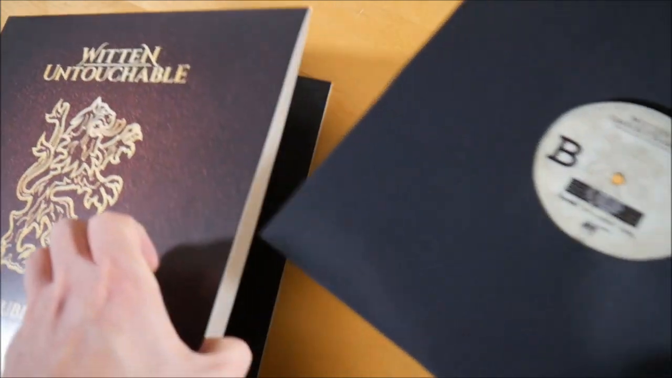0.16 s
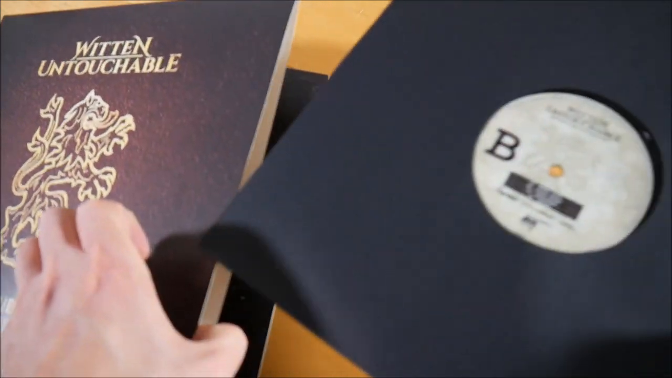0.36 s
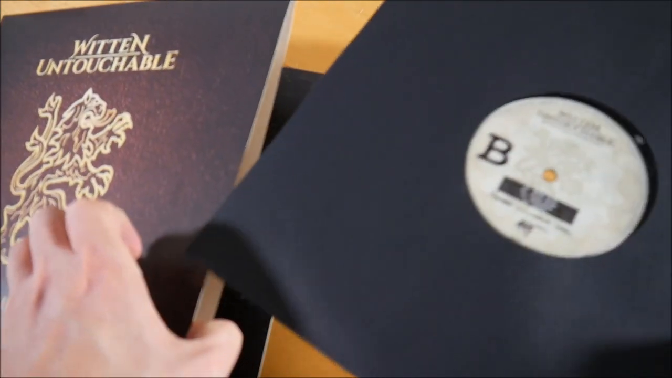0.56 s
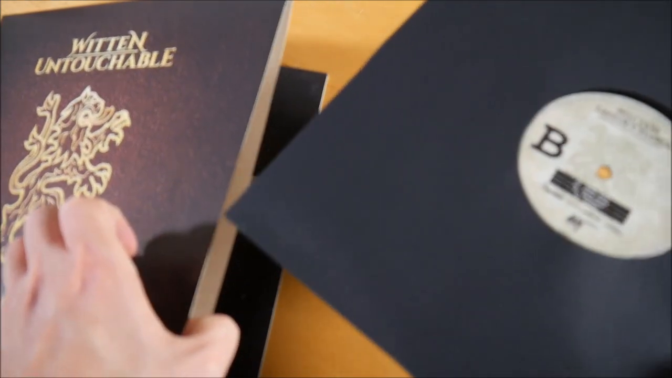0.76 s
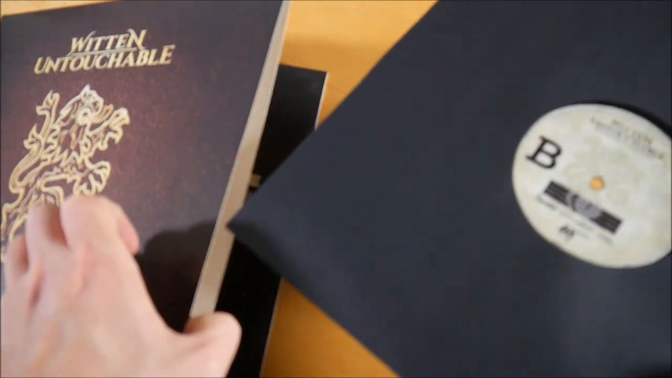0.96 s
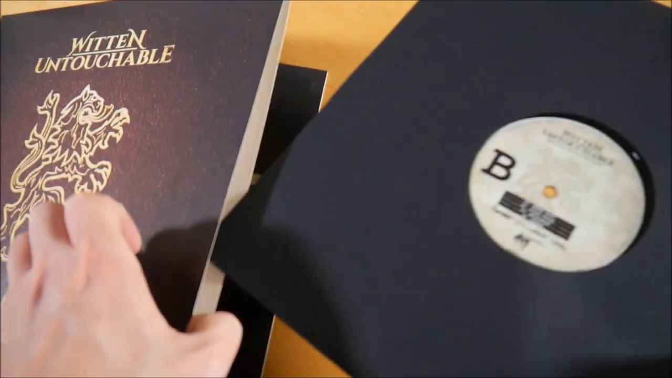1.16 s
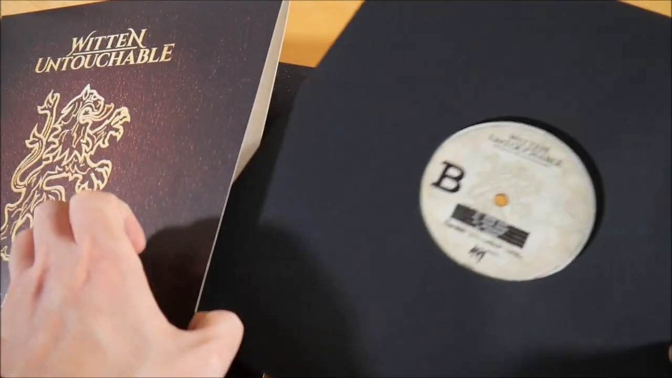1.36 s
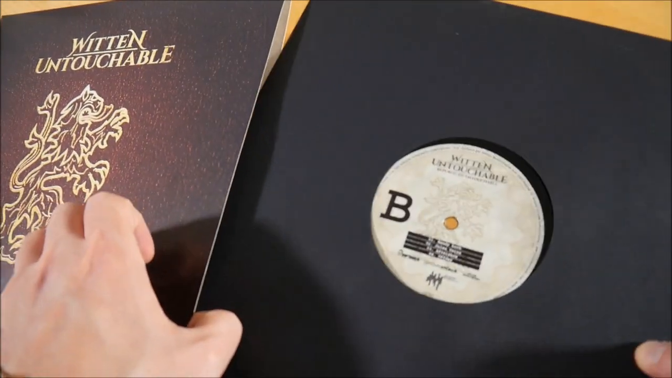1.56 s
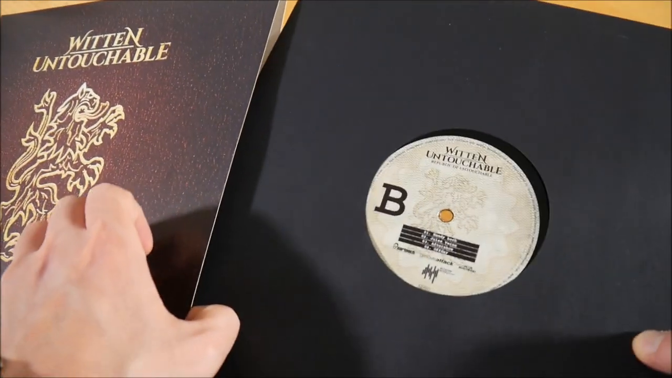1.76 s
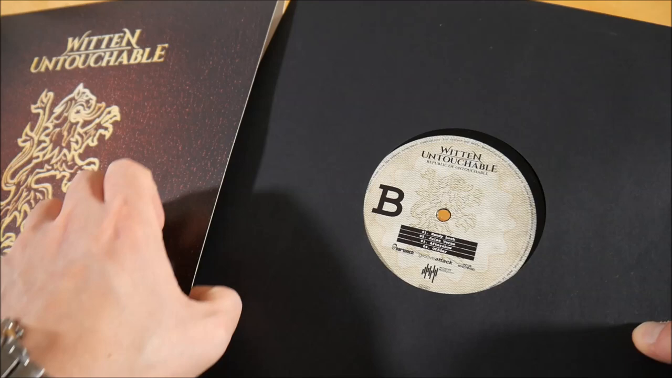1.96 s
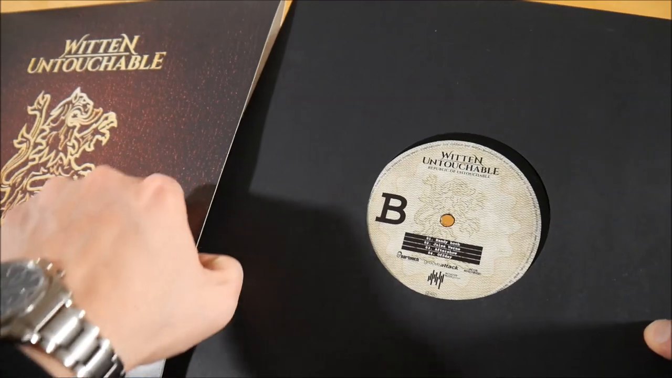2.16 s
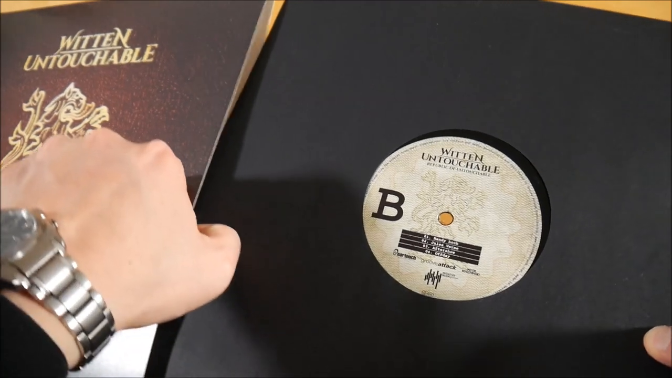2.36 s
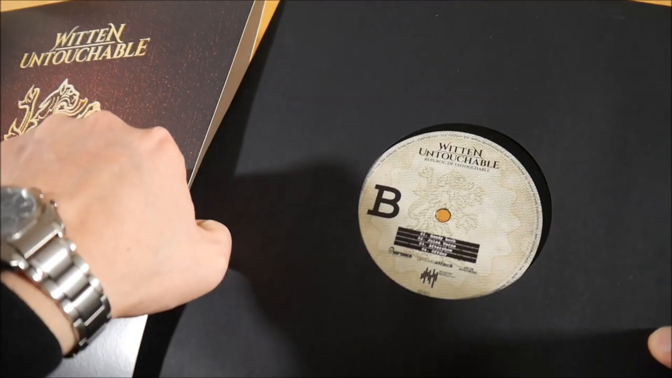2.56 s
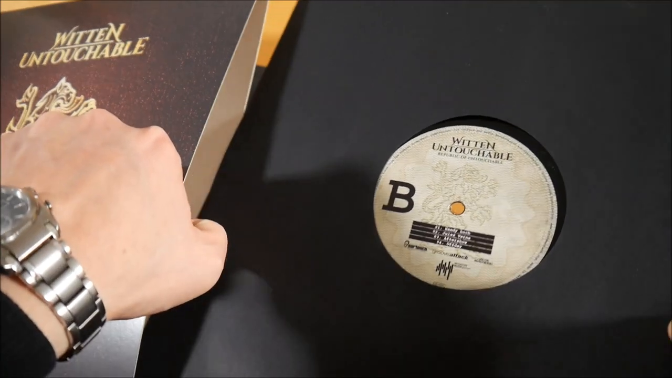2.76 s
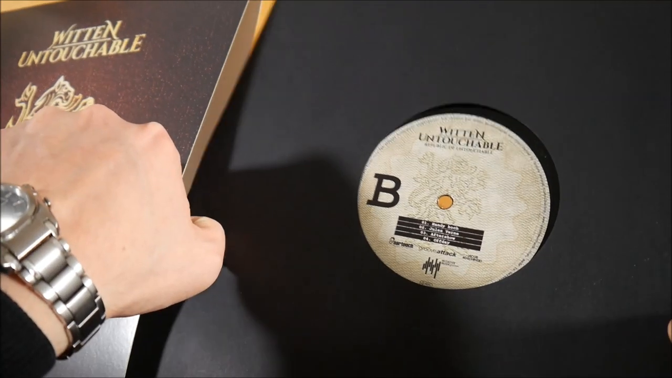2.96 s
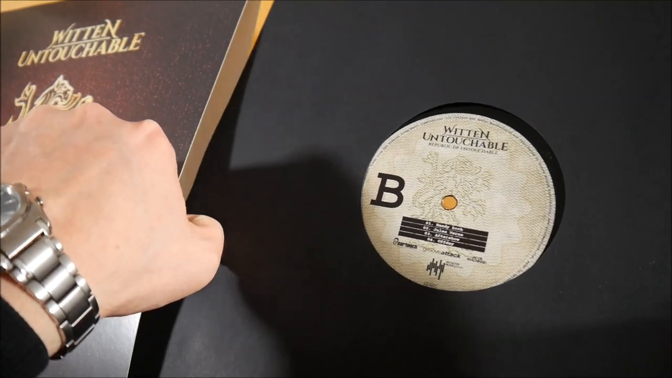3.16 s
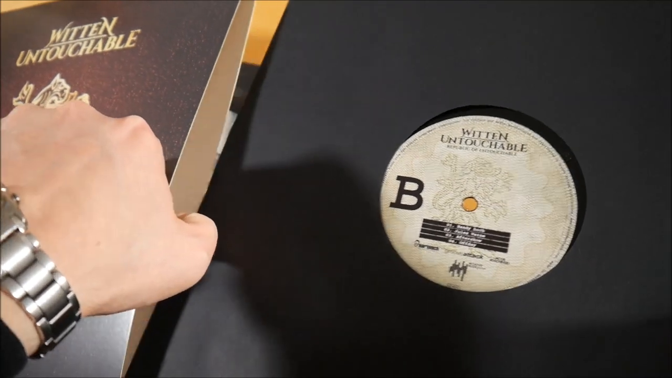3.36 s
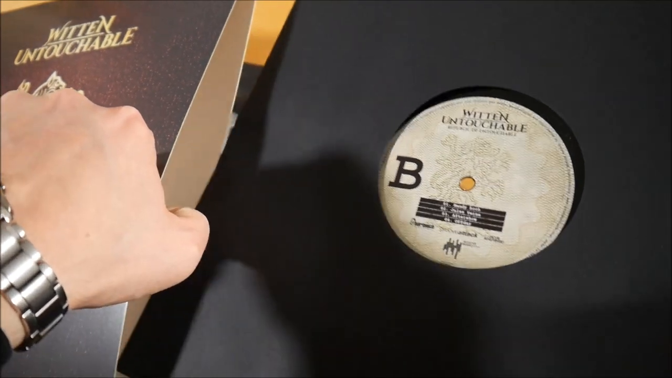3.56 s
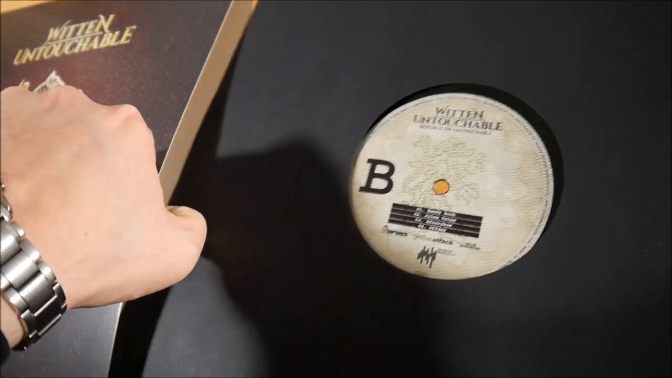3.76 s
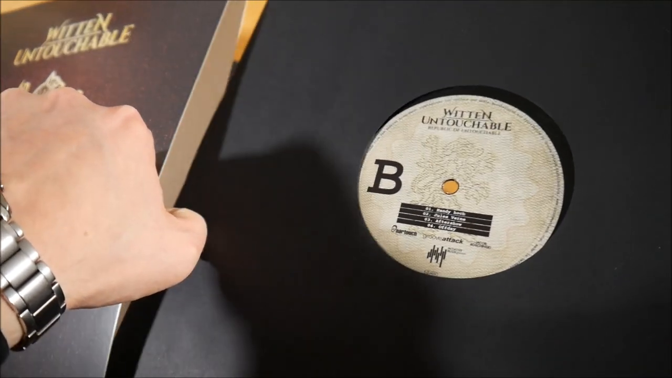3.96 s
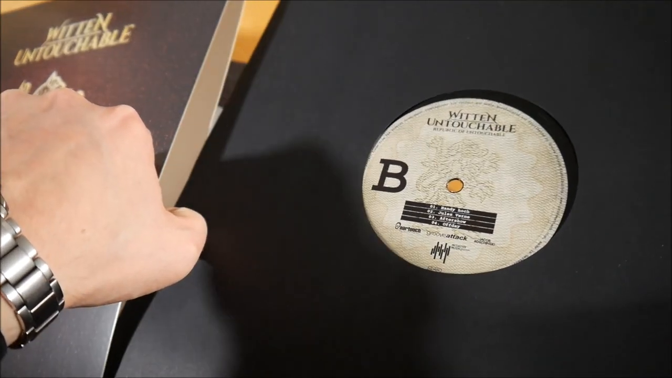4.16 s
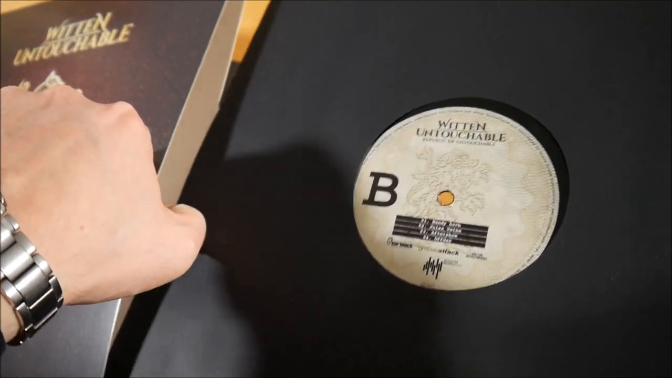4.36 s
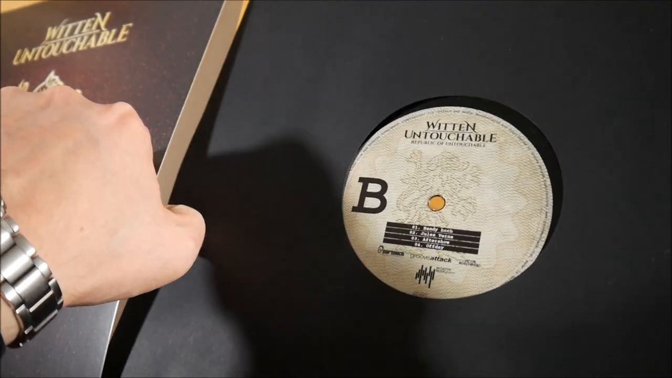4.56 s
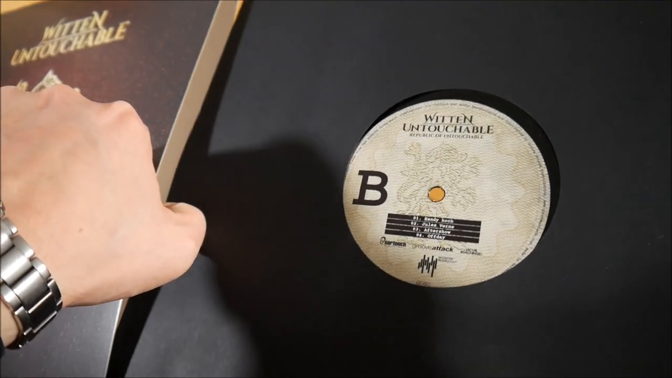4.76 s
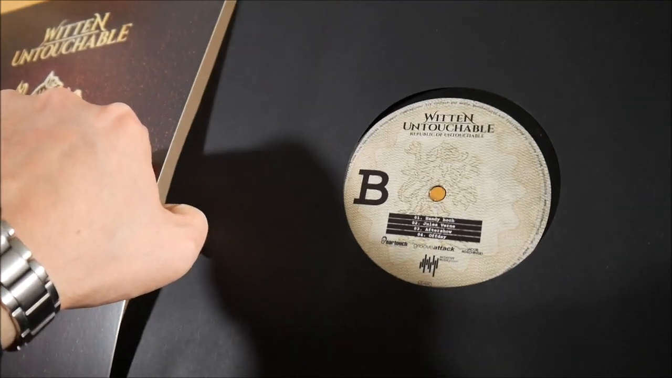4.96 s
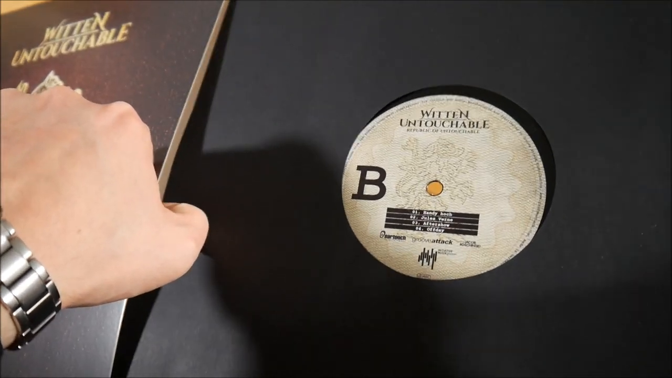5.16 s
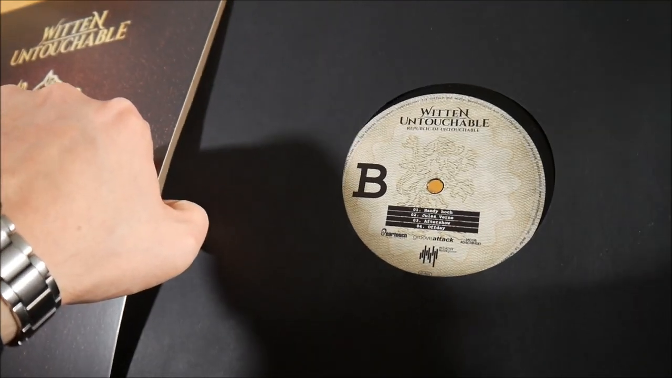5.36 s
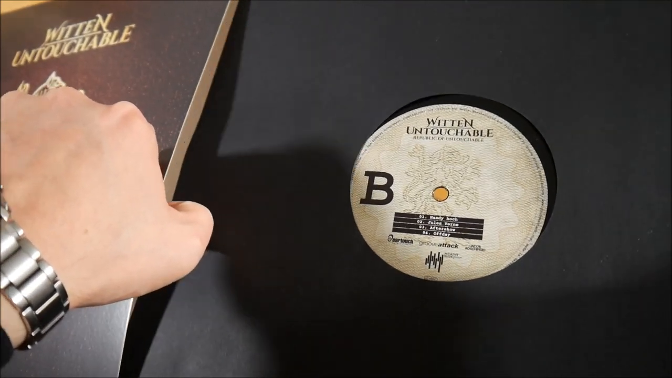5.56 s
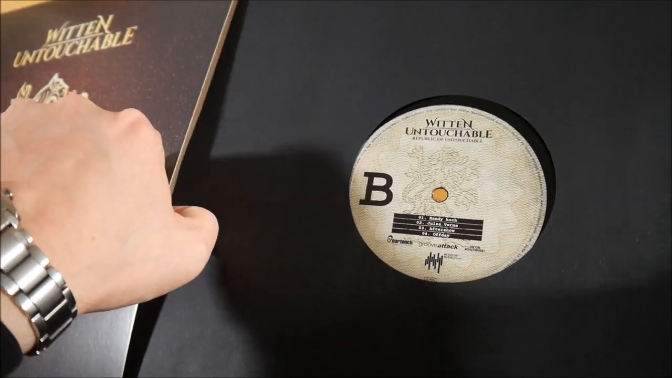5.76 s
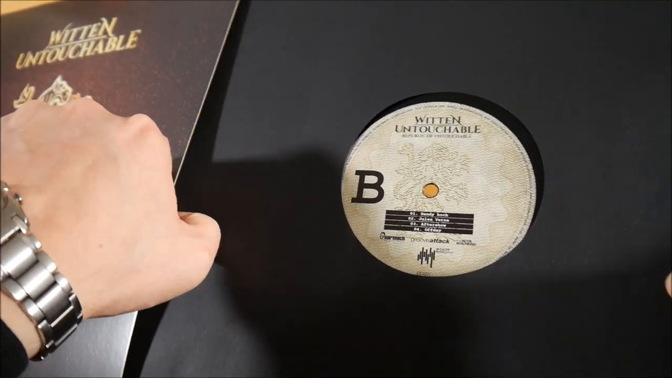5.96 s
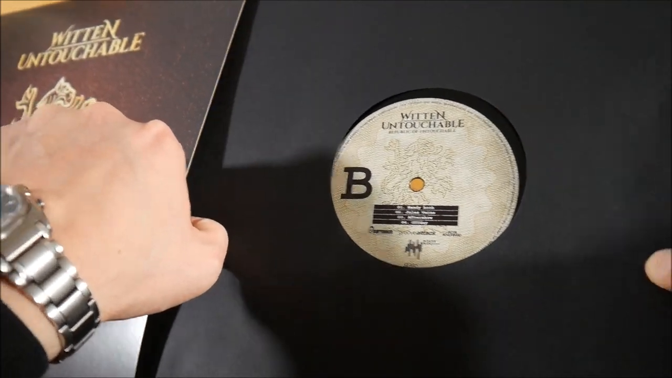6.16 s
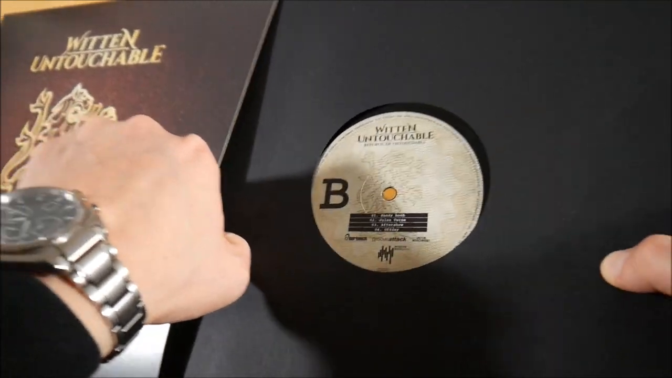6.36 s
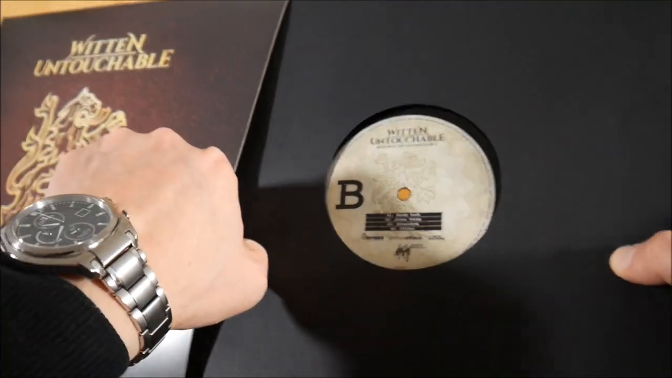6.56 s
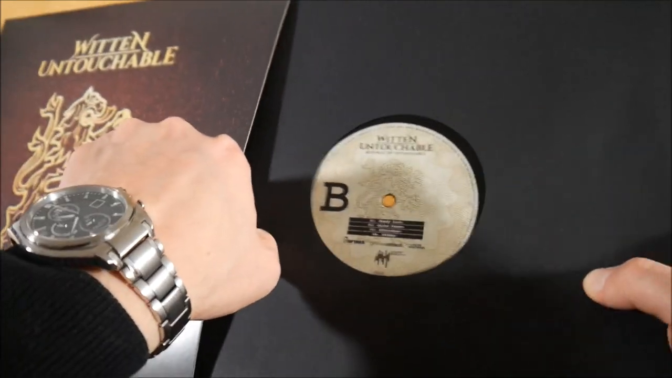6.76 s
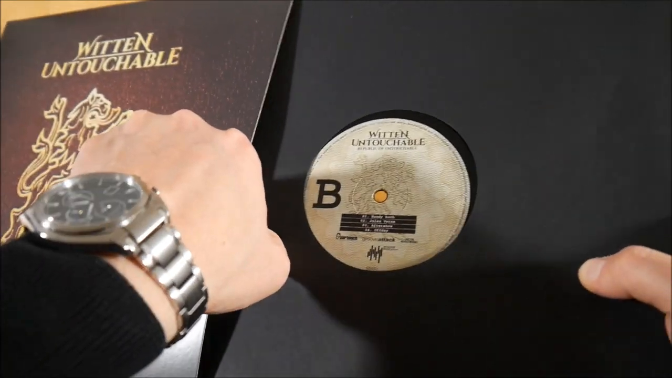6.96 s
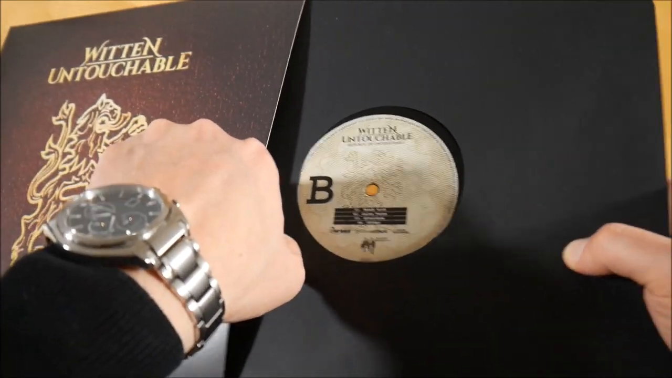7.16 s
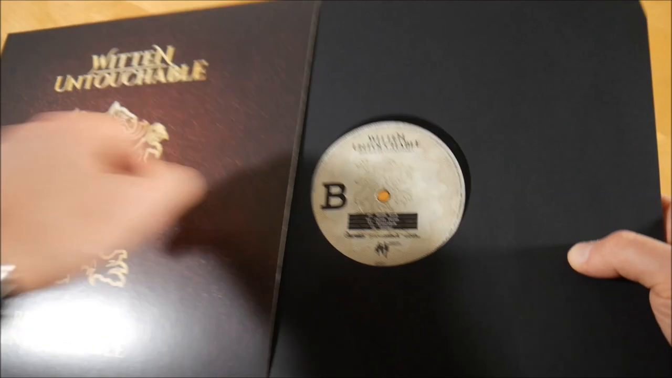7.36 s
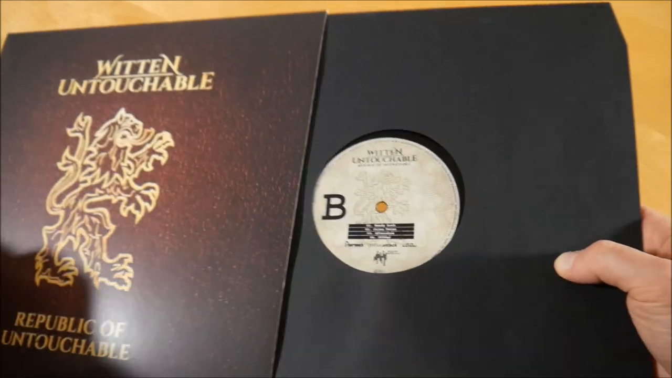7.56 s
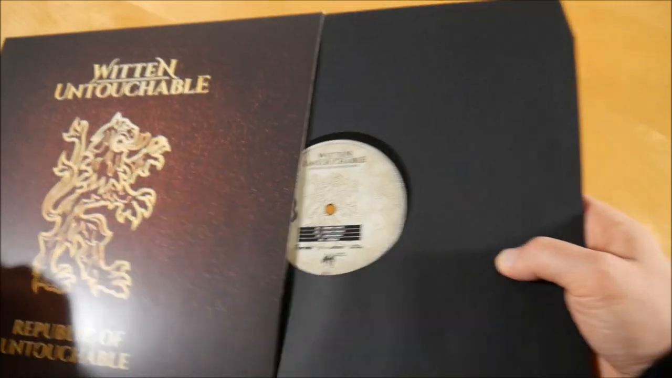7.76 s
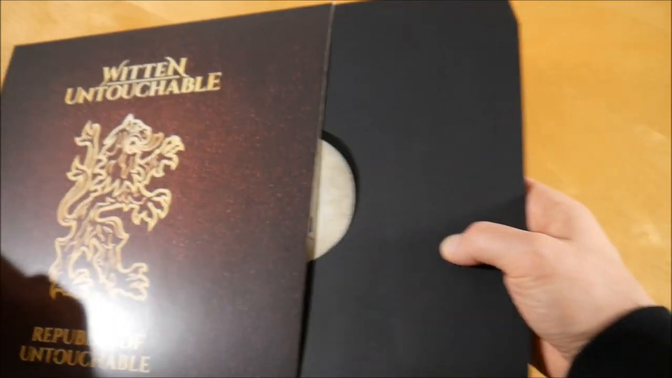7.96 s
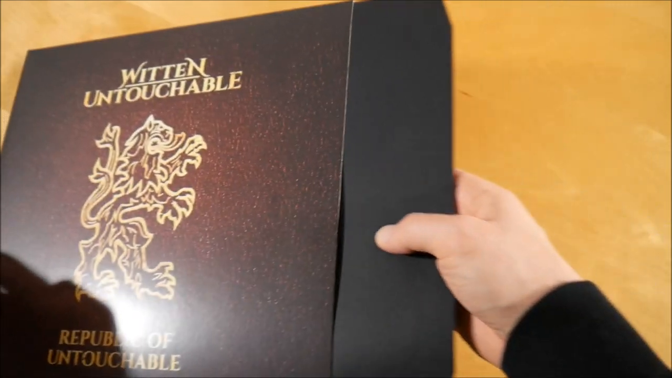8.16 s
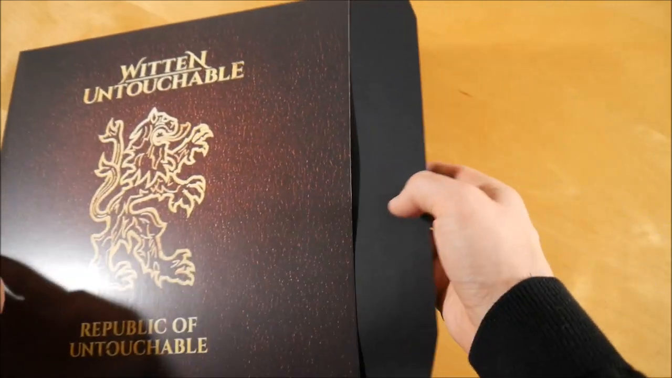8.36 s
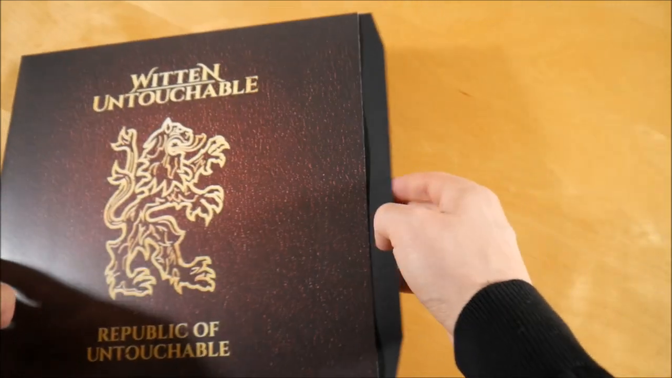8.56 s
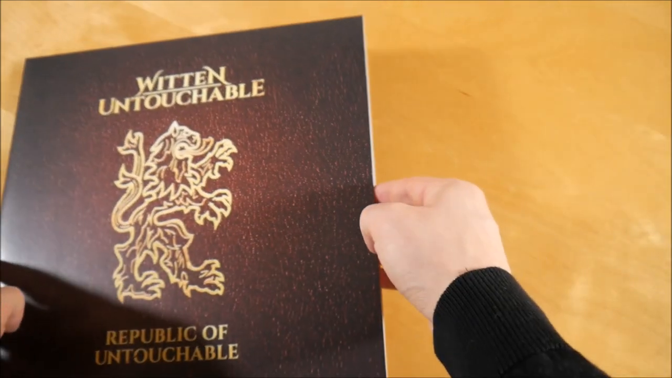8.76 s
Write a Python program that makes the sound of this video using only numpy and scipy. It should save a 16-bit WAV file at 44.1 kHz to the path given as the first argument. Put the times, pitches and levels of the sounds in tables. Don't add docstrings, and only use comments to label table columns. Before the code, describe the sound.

Close papery rubbing and small cardboard taps in a quiet room, two sharp knocks midway, then near-continuous dragging as a sleeved record slides in.

```python
import sys
import numpy as np
from scipy import signal
from scipy.io import wavfile
from scipy.ndimage import uniform_filter1d

SR = 44100
rng = np.random.default_rng(int(sys.argv[2]) if len(sys.argv) > 2 else 0)


def store_pcm(level_fs):
    pcm = np.round(np.clip(level_fs, -1, 1) * 32767).astype(np.int16)
    wavfile.write(sys.argv[1], SR, np.atleast_2d(pcm).T)


def ratio(d):
    e = np.asarray(d, float) / 20
    return 10 ** e


N = 388080

PUSH_S = 6.0

# start in seconds, peak level in dB, pitch in Hz.
SEEKING_KNOCKS = [(0.481, -40, 417), (0.505, -37.5, 398), (1.594, -37, 378), (1.859, -40, 374),
                  (2.011, -35, 406), (2.042, -37.5, 320), (2.203, -32, 340), (2.577, -52, 710),
                  (3.05, -16.5, 450), (3.072, -25.5, 435), (3.085, -36, 390), (3.8662, -10, 500),
                  (3.877, -24.5, 360), (3.883, -27.5, 496), (4.11, -37.5, 304), (4.371, -43, 288),
                  (4.462, -37, 305), (4.565, -38.5, 440), (4.633, -37.5, 294), (4.725, -37.5, 362),
                  (4.865, -36.5, 500), (5.156, -31, 383), (5.212, -35, 384), (5.302, -42, 410),
                  (5.549, -39.5, 727), (5.579, -34.5, 374), (5.637, -32.5, 356), (5.645, -30, 350),
                  (5.891, -37.5, 376), (5.981, -46, 380)]
# start in seconds, peak level in dB, pitch in Hz.
PUSH_KNOCKS = [ (6.196, -35.5, 402), (6.592, -40.5, 452), (6.739, -36, 371), (6.978, -39, 393.2),
               (7.158, -29.5, 427), (7.273, -20.5, 618), (7.368, -32.5, 350), (7.423, -35, 600),
               (7.493, -29, 590), (7.4975, -21, 640), (7.511, -23, 560), (7.5145, -21, 580),
               (7.524, -27, 600), (7.687, -27.5, 585), (7.701, -29.5, 604), (7.754, -23, 737),
               (7.896, -31, 500), (8.341, -32.5, 690), (8.406, -28, 550), (8.747, -31.5, 892)]


def evened(x):
    return x / np.sqrt(np.mean(x ** 2) + 1e-20)


def read(points, hz):
    f, value = np.transpose(points)
    return np.interp(np.log(hz + 1), np.log(f + 1), value)


def follow(points, t):
    return np.interp(t, *np.transpose(points))


def add(mix, s, sound):
    part = mix[round(s * SR):][:len(sound)]
    part += sound[:len(part)]


def resonate(x, hz, width):
    turn = np.exp(2j * np.pi * np.cumsum(hz * np.ones(x.shape[-1])) / SR)
    r = np.exp(-np.pi * width / SR)
    return 2 * (turn * signal.lfilter([1 - r], [1, -r], x / turn)).real


def resonate_twice(x, hz, width):
    return resonate(resonate(x, hz, width), hz, width)


def pair(shared, apart, same, colour, patchy_db, size):
    overlap = size * 3 // 4
    hz, _, (a, b) = signal.stft(np.array([shared, apart]), SR, nperseg=size, noverlap=overlap)
    blotches = rng.standard_normal(a.T.shape)
    patches = evened(uniform_filter1d(uniform_filter1d(blotches, 14, 0), 5, 1)).T
    likeness = np.clip(read(same, hz), 0, 1)
    side = np.sqrt((1 - likeness) / (1 + likeness))[:, None]
    z = np.array([a + side * b, a - side * b])
    z = z * ratio(read(colour, hz)[:, None] + patchy_db * patches)
    return signal.istft(z, SR, nperseg=size, noverlap=overlap)[1][:, :N]


def air():
    # frequency in Hz, level in dB per Hz.
    hiss_colour = [(15, -44), (25, -38), (48, -36), (64, -24), (108, -14), (170, -14), (212, -7),
                   (249, -13), (317, -21.5), (624, -28.5), (714, -19.5), (2550, -33), (11600, -41),
                   (14800, -43.5), (16000, -59)]
    # frequency in Hz, left-right likeness from 0 to 1.
    hiss_likeness = [(30, 0.18), (200, 0.27), (1000, 0.046), (4000, 0.047), (14000, 0.22)]
    # frequency in Hz, width in Hz, level in dB.
    hum_lines = [(112.4, 9.7, -71.5), (214, 19, -58), (282.6, 16, -67)]
    # time in seconds, hum gain in dB.
    hum_swell = [(0, -1), (3.6, 0), (4.2, -2), (6, -3), (8.8, -17)]
    # time in seconds, drone level in dB.
    drone_fade = [(0, -70), (1, -70), (1.6, -81), (2.6, -81), (3.3, -80), (4, -92)]
    # time in seconds, gain in dB.
    bass_fade = [(0, 2), (4.4, 1), (5.0, -2.5), (8.8, -3.5)]
    hiss_db, drone_hz, bass_top_hz = -54.5, 40, 150
    t = np.arange(N) / SR

    noise = rng.standard_normal((2, N))
    hiss = evened(pair(*noise, hiss_likeness, hiss_colour, patchy_db=0, size=2048))
    hiss = ratio(hiss_db - 3) * hiss
    bass = signal.sosfiltfilt(signal.butter(2, bass_top_hz, fs=SR, output="sos"), hiss)
    hiss = hiss + bass * (ratio(follow(bass_fade, t)) - 1)

    hum = np.zeros(N)
    for hz, width, db in hum_lines:
        hum += ratio(db) * evened(resonate_twice(rng.standard_normal(N), hz, width))

    side_phase = np.array([[0], [.9]])
    drone = ratio(follow(drone_fade, t)) * np.sin(2 * np.pi * drone_hz * t + side_phase)
    return hiss + drone + hum * ratio(follow(hum_swell, t))


def focus_motor():
    # frequency in Hz, level in dB, t60 in seconds.
    shell_modes = [(710, -55.5, 0.043), (858, -59.5, 0.036), (433, -69, 0.025)]
    first_s, gap_s = .019, .04
    at = np.arange(first_s, N / SR, gap_s)
    train, t = np.zeros(N), np.arange(round(.08 * SR)) / SR
    train[(at * SR).astype(int)] = ratio(1.3 * rng.standard_normal(len(at)))
    shell = sum(ratio(db - 60 * t / t60) * np.sin(2 * np.pi * hz * t) for hz, db, t60 in shell_modes)
    return signal.oaconvolve(train, shell)[:N]


def strokes(t, rows, onset_s, climb_db, sag_db, release_s):
    silent_db = 39
    levels_db = [-silent_db - climb_db, -climb_db, 0, -sag_db, -silent_db - sag_db]
    power = np.zeros((2, len(t)))
    for start, peak, stop, hiss_db, card_db in rows:
        times = [start - onset_s, start, peak, stop, stop + release_s]
        shape_db = np.interp(t, times, levels_db, -99, -99)
        power += ratio(2 * (shape_db + np.array([[hiss_db], [card_db]])))
    return power


def effort(t):
    # start, peak and stop in seconds,
    # paper hiss in dB, card shake in dB.
    jerks = [(.477, 0.49, .57, -45, -57), (1.241, 1.25, 1.31, -45, -55.5), (1.357, 1.364, 1.4, -40.5, -59),
             (1.39, 1.422, 1.54, -36, -52), (1.54, 1.563, 1.61, -39.5, -51), (2.712, 2.74, 2.8, -47.5, -43),
             (3.74, 3.775, 3.81, -49, -44.5), (4.368, 4.435, 4.52, -51, -53),
             (5.98, 6.08, 6.25, -45.5, -57.5), (6.1, 6.14, 6.3, -60, -47), (6.603, 6.633, 6.71, -51, -44.5),
             (7.357, 7.375, 7.44, -49, -46), (7.696, 7.8, 7.84, -39.5, -52)]
    # start, peak and stop in seconds,
    # paper hiss in dB, card shake in dB.
    sweeps = [(0, -0.04, 0.31, -65, -59), (1.59, 1.64, 1.68, -38.5, -42), (1.94, 2.04, 2.065, -47, -48),
              (2.05, 2.1, 2.27, -49, -49), (2.48, 2.52, 2.77, -69, -65), (2.77, 2.82, 2.95, -53, -50),
              (2.95, 3.01, 3.07, -49.5, -50), (3.545, 3.62, 3.68, -41, -47), (3.7, 3.72, 3.76, -53, -51),
              (3.74, 3.83, 3.88, -44, -50), (3.94, 4.01, 4.08, -53, -51), (4.707, 5.5, 4.79, -62.5, -66),
              (4.834, 4.862, 4.88, -58, -50), (5.7, 5.785, 5.8, -64, -58), (6.22, 6.3, 6.36, -40, -48),
              (6.32, 6.405, 6.43, -39, -50), (6.43, 6.47, 6.495, -41.5, -51), (6.52, 6.55, 6.58, -56, -56),
              (7.22, 7.29, 7.345, -39.5, -47.5), (7.492, 7.515, 7.55, -41.5, -40),
              (7.81, 7.88, 7.935, -38.5, -47), (7.93, 7.96, 8.05, -43.5, -51),
              (8.01, 8.06, 8.11, -38.5, -51), (8.07, 8.125, 8.21, -36.5, -48.5),
              (8.16, 8.26, 8.325, -35.5, -46), (8.31, 8.35, 8.42, -42.5, -47),
              (8.44, 8.53, 8.605, -40, -46), (8.625, 8.66, 8.73, -39.5, -47),
              (8.73, 8.79, 8.88, -41.5, -43)]
    # start and stop in seconds,
    # paper hiss in dB, card shake in dB.
    jams = [
        (0.577, 0.627, -51.5, -58),
        (2.29, 2.41, -59.5, -59),
        (3.275, 3.39, -50, -52),
        (3.4, 3.465, -49.5, -50),
        (6.797, 6.879, -40, -46.5),
        (6.992, 7.19, -42, -47.5),
        (6.922, 6.984, -52, -57),
        (7.62, 7.686, -57, -54),
    ]
    rest_hiss_db, rest_card_db = -78.5, -71.5
    drag_hiss_db, drag_card_db = -63, -57.5
    shake_share, shake_db, shake_t60 = 0.73, -23, 0.2

    peak_at_stop = [(start, stop, stop, *levels) for start, stop, *levels in jams]
    power = strokes(t, jerks, onset_s=0.005, climb_db=6, sag_db=5.5, release_s=0.08)
    power = power + strokes(t, sweeps, onset_s=0.075, climb_db=11, sag_db=5, release_s=0.08)
    power = power + strokes(t, peak_at_stop, onset_s=0.028, climb_db=6.5, sag_db=0, release_s=0.061)
    hiss, card = power
    for s, db, _ in SEEKING_KNOCKS + PUSH_KNOCKS:
        card = card + (t > s) * ratio(2 * (shake_share * db + shake_db - 60 * abs(t - s) / shake_t60))
    hiss = hiss + ratio(2 * np.where(t < PUSH_S, rest_hiss_db, drag_hiss_db))
    card = card + ratio(2 * np.where(t < PUSH_S, rest_card_db, drag_card_db))
    return 10 * np.log10([hiss, card])


def fibres(per_s, spread_db):
    size = ratio(spread_db * np.minimum(rng.exponential(1, N), 4)) * rng.standard_normal(N)
    return evened(size * (rng.random(N) < per_s / SR))


def air_gap(x, hz, width):
    wide = np.clip((width - 400) / 1400, 0, 1)
    return (1 - wide) * resonate(x, hz, 400) + wide * resonate(x, hz, 1800)


def rubbing():
    # frequency in Hz, level in dB per Hz.
    rub_colour = [(120, -23), (200, 10), (249, -3.5), (440, -3.5), (1230, -9.5), (1650, -6.5), (4120, -9.5),
                  (7970, -11.5), (10100, 0), (15300, 13), (16000, -50)]
    # frequency in Hz, left-right likeness from 0 to 1.
    rub_likeness = [(300, 0.75), (1200, 0.74), (3000, 0.92), (8000, 0.9), (14000, 0.63)]
    layer_bands = [(50, 170), (280, 1100), (1100, 3000), (3000, 7800), (7800, 16500)]
    # time in seconds, resonance in Hz, strength in dB, width in Hz.
    gap_path = [(0, 1920, -1, 900), (.46, 2220, -20, 900), (1.2, 3500, 1, 1500), (1.38, 5200, 4, 1800),
                (1.5, 4350, -16, 1500), (1.57, 2780, -4, 900), (2.7, 2800, -9, 905), (3.04, 4160, 3, 1200),
                (3.35, 2700, 1, 1210), (3.6, 4230, 5, 1510), (3.96, 4180, 3, 700), (5.97, 4060, -10, 700),
                (6.3, 4200, 4, 800), (6.55, 4000, -2.5, 700), (7.3, 4061, 5, 700), (8.035, 4170, -5, 600),
                (8.045, 2020, 2, 1300), (8.8, 1640, 5, 1300)]
    # time in seconds, resonance in Hz.
    flap_path = [(0, 387), (1.5, 504), (2.2, 390), (2.78, 420), (2.88, 970), (3.1, 420), (3.4, 412),
                 (3.7, 940), (4, 370), (6, 395), (6.3, 437), (6.9, 470), (7.1, 695), (7.4, 510), (8, 760),
                 (8.8, 736)]
    t = np.arange(N) / SR
    hiss_db, rumble_db = (np.interp(t, t[::44], db) for db in effort(t[::44]))
    gap_s, gap_points_hz, gap_points_db, gap_points_width = np.transpose(gap_path)
    gap_hz = np.interp(t, gap_s, gap_points_hz)
    gap_gain = 1.26 * ratio(np.interp(t, gap_s, gap_points_db))
    gap_width = np.interp(t, gap_s, gap_points_width)

    deep = np.log2(4000 / gap_hz)
    coarse_db = -1 + 4 * deep + 0.34 * (rumble_db - hiss_db)
    fine_db = -14.5 - 0.092 * (hiss_db + 53) + 2.2 * np.clip(deep, 0, 1) * (t > PUSH_S)
    levels_db = [0.9 * rumble_db - 32.5, rumble_db, hiss_db + coarse_db, hiss_db, hiss_db + fine_db]

    shared, apart = fibres(16000, 1.58), fibres(16000, 2.8)
    scrape = evened(pair(shared, apart, rub_likeness, rub_colour, patchy_db=1.9, size=512))
    breathing = 1 + 0.036 * evened(uniform_filter1d(rng.standard_normal(N), 1500))
    scrape = scrape + gap_gain * air_gap(scrape, breathing * gap_hz, gap_width)
    scrape = scrape + 0.81 * resonate(scrape, follow(flap_path, t), 270)

    out = np.zeros((2, N))
    for band, db in zip(layer_bands, levels_db):
        layer = signal.sosfilt(signal.butter(3, band, "band", fs=SR, output="sos"), scrape)
        loudness = np.sqrt(abs(uniform_filter1d((layer ** 2).mean(0), 4000)))
        out += ratio(db) * layer / loudness
    judder = ratio(1.2 * evened(uniform_filter1d(rng.standard_normal(N), 500)))
    return out * judder


def room(x):
    # frequency in Hz, t60 in seconds.
    room_decay = [(200, 0.16), (1000, 0.23), (4000, 0.25), (12000, 0.15)]
    taps = np.zeros((2, SR // 2))
    at = np.arange(120, SR // 2 - 20, 20)
    at = at + rng.integers(0, 20, (2, len(at)))
    np.put_along_axis(taps, at, rng.choice([-1., 1.], at.shape), 1)
    hz, t, z = signal.stft(taps, SR, nperseg=256)
    decay = ratio(-60 * t / read(room_decay, hz)[:, None])
    tail = signal.istft(z * decay, SR, nperseg=256)[1]
    return signal.fftconvolve(x[None], tail / np.linalg.norm(tail[0]), axes=1)[:, :N]


def ticks():
    # start in
    # seconds, peak level in dB, centre in Hz, t60 of the puff in seconds.
    edge_ticks = [(0.4775, -35.5, 3150, 0.045), (1.862, -37.5, 1500, 0.076), (2.577, -47.5, 2860, 0.056),
                  (2.617, -43.5, 1900, 0.049), (3.0495, -40, 1570, 0.042), (3.075, -34, 1510, 0.078),
                  (3.8653, -20, 1700, 0.05), (3.866, -26, 9000, 0.03), (3.8882, -32, 1570, 0.05),
                  (4.111, -34.5, 1890, 0.072), (4.2744, -47, 2018, 0.082), (4.374, -40, 3280, 0.04),
                  (4.58, -41.5, 9735, 0.047), (4.3948, -46, 4390, .04), (4.4497, -42, 5380, .03),
                  (4.4757, -37, 10000, .025), (4.6483, -46.5, 6000, .04), (4.7426, -47, 4000, .04),
                  (5.9882, -38.5, 4380, .04), (1.475, -29, 4290, .03), (4.7283, -47, 2500, 0.08),
                  (4.754, -42, 10800, 0.044), (4.789, -49, 1980, 0.045), (4.864, -34.5, 1760, 0.063),
                  (5.154, -42, 2550, 0.082), (5.234, -43.5, 3070, 0.046), (5.2936, -48.5, 2420, 0.035),
                  (5.414, -38, 5460, 0.032), (5.439, -41, 2290, 0.075), (5.5513, -34.5, 4160, 0.065),
                  (5.6366, -33.5, 4300, 0.054), (5.71, -42.5, 4100, 0.046), (5.7753, -43, 3700, 0.084),
                  (5.887, -44.5, 3030, 0.1),
                  (6.6043, -29.5, 4270, 0.054), (6.613, -30, 4950, 0.072), (6.6528, -34, 1690, 0.025),
                  (6.745, -41.5, 4730, 0.05), (7.2752, -22, 2040, 0.047), (7.4042, -31.5, 2000, 0.027),
                  (7.4402, -34.5, 4100, 0.067), (7.4915, -33, 2100, 0.09), (7.5095, -24, 2200, 0.1),
                  (7.689, -36, 1660, .04), (8.345, -29, 1800, .03), (8.574, -29, 2000, 0.041),
                  (7.7545, -15.5, 2050, 0.027), (7.8952, -25.5, 1780, 0.1)]
    out, t = np.zeros(N), np.arange(round(.12 * SR)) / SR
    for s, db, hz, t60 in edge_ticks:
        noise = rng.standard_normal(len(t))
        wide = signal.lfilter([1, -.85], [1], noise)
        grain = evened(evened(resonate(noise, hz, 0.4 * hz)) + 0.058 * evened(wide))
        sharp = np.clip(1.8 - t60 / 0.069, 0, 1)
        snap = 0.9 * sharp * np.exp(-t / 0.00075)
        puff = (.7 - 0.47 * sharp) * ratio(-60 * t / t60) * (1 - (1 - sharp) * np.exp(-t / 0.0018))
        add(out, s, ratio(db) * grain * (snap + puff))
    return out


def knocks():
    # start in seconds, peak level in dB, pitch in Hz.
    fingertip_nudges = [(0.644, -42, 305), (1.646, -18.5, 450), (1.66, -30, 400), (4.65, -38, 380),
                        (4.66, -42, 400), (4.882, -40, 380), (4.895, -44, 420), (6.715, -44, 400),
                        (6.76, -44, 399.8), (7.955, -37.5, 851), (4.265, -46, 403), (5.435, -40, 414),
                        (7.645, -42, 425), (3.89, -34.5, 1055), (3.92, -38, 1160)]
    # pitch factor, level in dB, t60 factor.
    jacket_modes = [(0.998, 0, 1.68), (1.25, -24, 0.52), (0.68, -1.5, 1.7), (1.85, -11.5, 1.1),
                    (2.4, -6, 0.19), (3.6, -14.5, 0.69)]
    soft_db_per_octave = -12
    blows = [(*row, False) for row in SEEKING_KNOCKS + PUSH_KNOCKS]
    blows += [(*row, True) for row in fingertip_nudges]
    out, t = np.zeros(N), np.arange(round(.3 * SR)) / SR
    for s, db, hz, soft in blows:
        t60 = 0.088 * (450 / hz) ** 0.067
        hard = np.clip((db + 44.5) / 24, 0, 1) * min(450 / hz, 1) ** 2 * (not soft)
        bend = t + .002 * hard * (1 - np.exp(-t / 0.0017))
        ring = np.zeros(len(t))
        for factor, mode_db, t60_factor in jacket_modes:
            soft_db = soft * soft_db_per_octave * max(np.log2(factor), 0)
            mode_t60 = (0.34 - .13 * hard) * t60 * t60_factor
            mode_hz = hz * factor * (0.912 + .12 * rng.random())
            ring += ratio(mode_db + soft_db - 60 * t / mode_t60) * np.sin(2 * np.pi * mode_hz * bend)
        ring *= 1.005 * (1 - np.exp(-t / (.0015 - 0.0012 * hard)))
        loose = evened(resonate_twice(rng.standard_normal(len(t)), 0.88 * hz, 520))
        rattle = (0.25 - .09 * hard) * loose * ratio(-60 * t / (1.26 * t60)) * (1 - np.exp(-t / 0.0027))
        add(out, s, ratio(db) * (ring + rattle))
    return out


def squeals():
    # start and stop in seconds, first and last pitch in Hz, level in dB.
    edge_songs = [(1.4, 1.47, 5900, 5600, -44), (1.868, 1.872, 1600, 1550, -51),
                  (1.95, 2.25, 2400, 2400, -59), (2.08, 2.3, 2800, 2850, -62), (6.0, 6.27, 3250, 3300, -55),
                  (6.27, 6.42, 4000, 4150, -43), (3.6, 3.69, 900, 950, -50),
                  (1.439, 1.5, 2450, 2350, -46.5), (1.455, 1.5, 3700, 3500, -45),
                  (1.54, 1.592, 2700, 3180, -46), (1.619, 1.685, 2850, 2770, -44.5),
                  (2.74, 2.78, 432, 450, -46), (3.9, 3.939, 1150, 1200, -51), (6.79, 6.89, 4130, 4050, -48),
                  (6.99, 7.2, 4350, 4250, -52), (7.0, 7.208, 2760, 2700, -54), (7.03, 7.2, 3800, 3750, -53),
                  (7.239, 7.318, 4200, 3900, -46.5), (7.785, 7.81, 4280, 4250, -40),
                  (7.83, 7.902, 4000, 4150, -44), (8.05, 8.1, 1990, 1980, -41),
                  (8.111, 8.18, 1620, 1560, -43.5), (8.12, 8.15, 2600, 2500, -43),
                  (8.2, 8.29, 1860, 1750, -45.5), (8.315, 8.335, 2010, 2000, -40),
                  (8.279, 8.36, 620, 720, -45.5), (8.45, 8.5, 1650, 1600, -47),
                  (8.509, 8.611, 1704, 1954, -43.5), (8.651, 8.72, 1660, 1750, -47),
                  (8.74, 8.8, 1000, 897, -47), (8.74, 8.8, 1653, 1700, -44)]
    width_share, edge_s = .1, .012
    out = np.zeros((N, 2))
    for start, stop, from_hz, to_hz, db in edge_songs:
        t = np.arange(0, stop - start + 2 * edge_s, 1 / SR)
        hz = np.interp(t, [0, t[-1]], [from_hz, to_hz])
        shared, apart = rng.standard_normal((2, len(t)))
        both = np.array([shared + 0.23 * apart, shared - .25 * apart])
        band = resonate_twice(both, hz, width_share * from_hz)
        ends = np.clip(np.minimum(t, t[-1] - t) / (2 * edge_s), 0, 1)
        add(out, start - edge_s, (ratio(db - 2.5) * evened(band) * ends).T)
    return out.T


def thuds():
    # start in seconds, peak level in dB, pitch in Hz.
    table_answers = [(1.645, -47, 197), (3.051, -40.5, 229), (3.866, -38, 260), (5.64, -46, 147),
                     (7.42, -50.5, 130), (7.495, -37, 260), (7.274, -41, 270), (7.69, -40.5, 200),
                     (7.754, -42.5, 154), (8.402, -49, 209.9), (8.415, -49, 120), (7.7, -44.5, 120)]
    out, t = np.zeros(N), np.arange(round(.3 * SR)) / SR
    for s, db, hz in table_answers:
        attack = 1 - np.exp(-t / 0.00043)
        add(out, s, ratio(db - 60 * t / 0.22) * np.sin(2 * np.pi * hz * t) * attack)
    return out


def scene():
    floor = air() + focus_motor()
    rub = rubbing()
    hits = ticks() + knocks()
    small_parts = signal.butter(4, [140, 13000], "band", fs=SR, output="sos")
    hits = signal.sosfilt(small_parts, hits)
    wet = room(ratio(-9) * rub.mean(0) + ratio(-14.0) * hits)
    close = rub + hits + thuds() + wet + 0.18 * wet[::-1]
    lean_db = np.interp(np.arange(N) / SR, [0, 3.6, 6.2, 8.8], [0.19, 0.38, -0.17, .5])
    return ratio(lean_db * np.array([[1], [-1]])) * close + floor + squeals()


def roll_off(x):
    return signal.sosfilt(signal.butter(12, 15800, fs=SR, output="sos"), x)


def record(dry):
    notched = signal.lfilter(*signal.iirnotch(7890, 45, SR), dry)
    mix = signal.sosfilt(signal.butter(12, 15900, fs=SR, output="sos"), notched)
    return roll_off(mix)


dry = scene()
out = record(dry)
store_pcm(out)
```